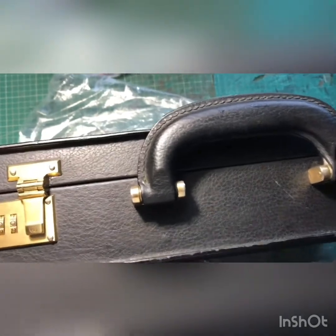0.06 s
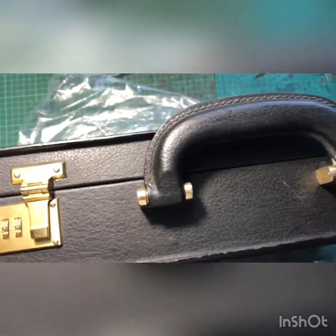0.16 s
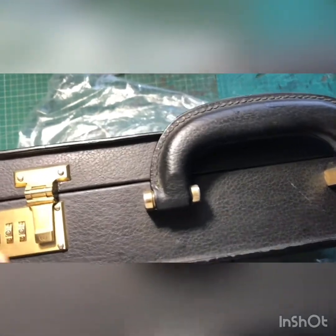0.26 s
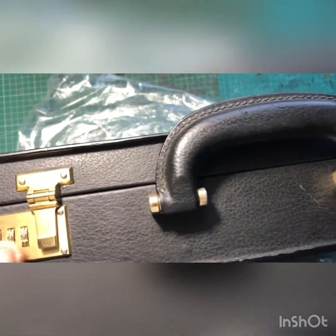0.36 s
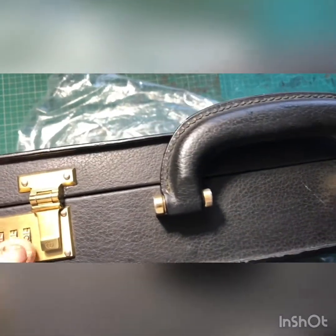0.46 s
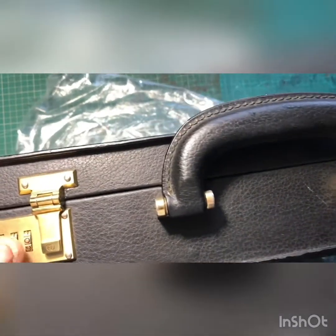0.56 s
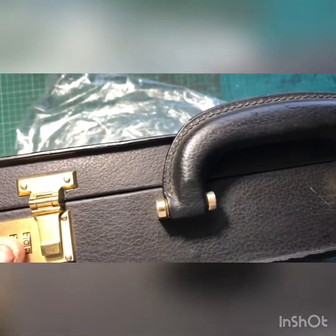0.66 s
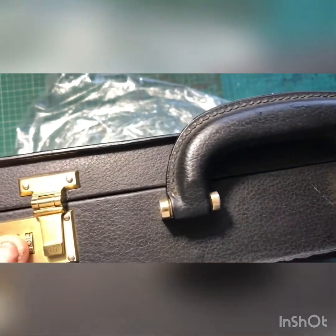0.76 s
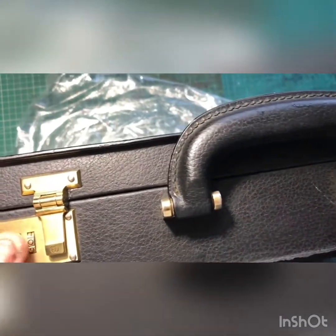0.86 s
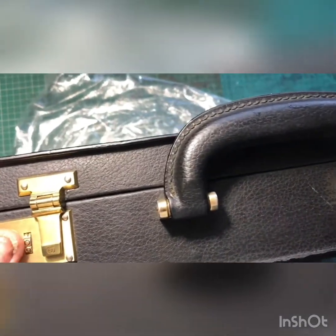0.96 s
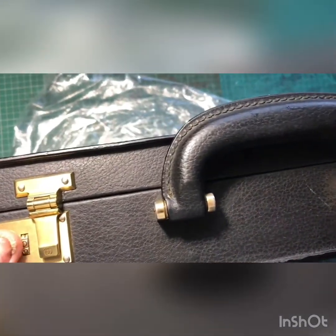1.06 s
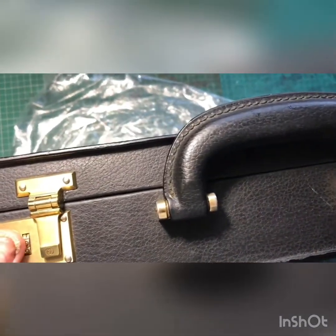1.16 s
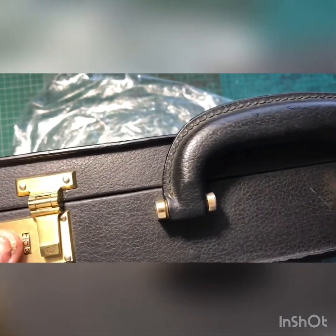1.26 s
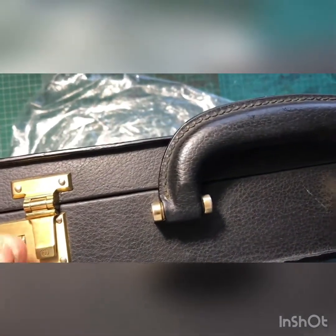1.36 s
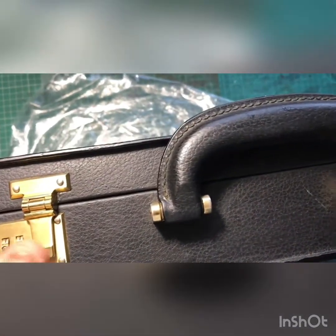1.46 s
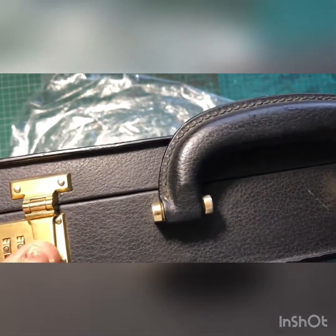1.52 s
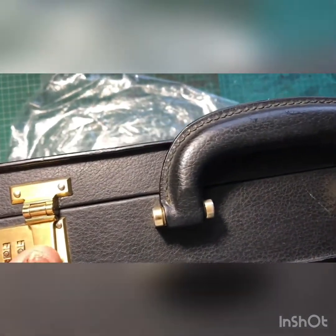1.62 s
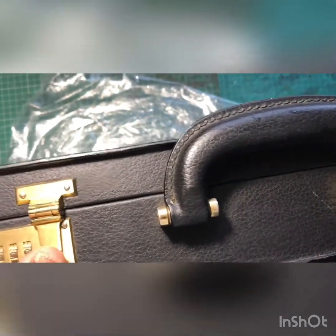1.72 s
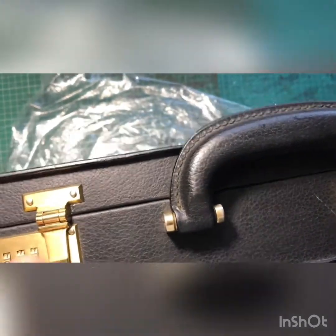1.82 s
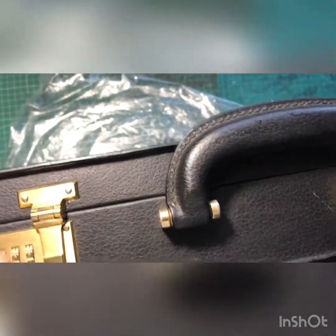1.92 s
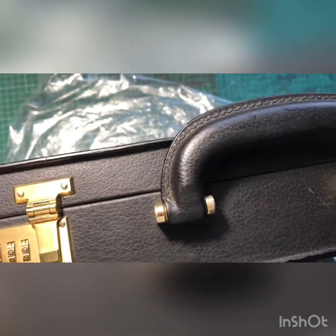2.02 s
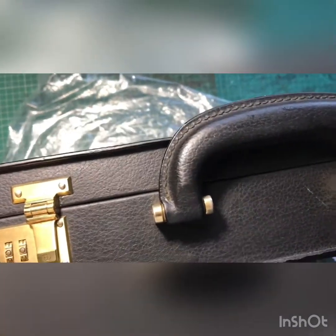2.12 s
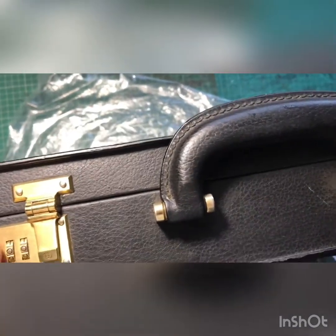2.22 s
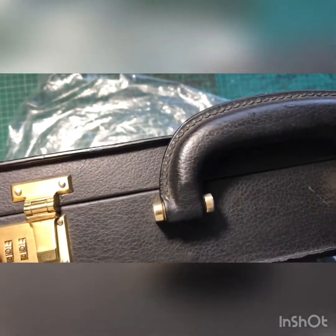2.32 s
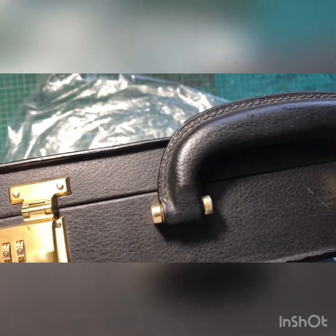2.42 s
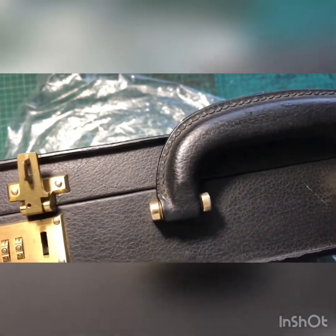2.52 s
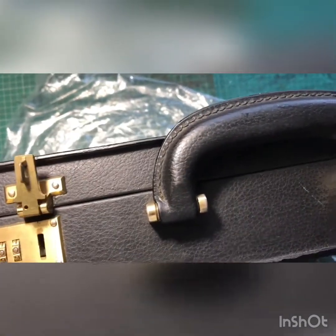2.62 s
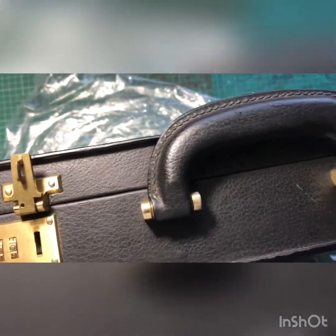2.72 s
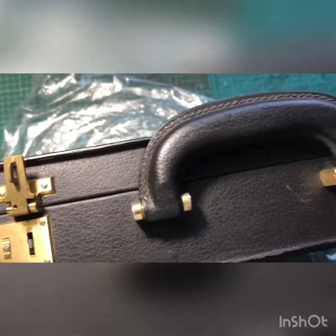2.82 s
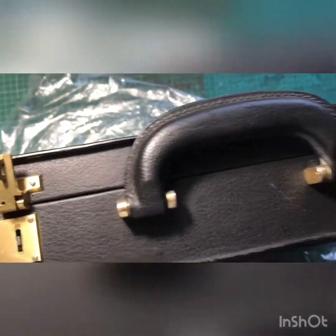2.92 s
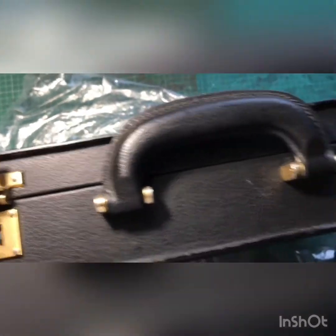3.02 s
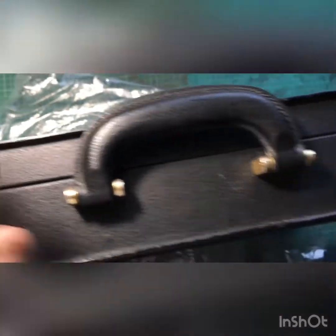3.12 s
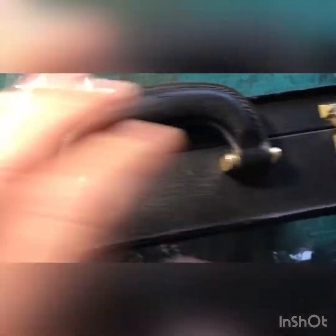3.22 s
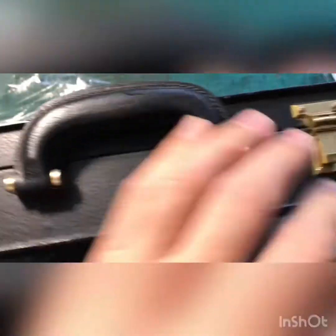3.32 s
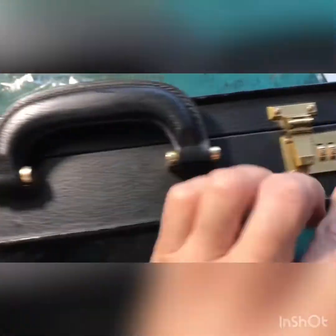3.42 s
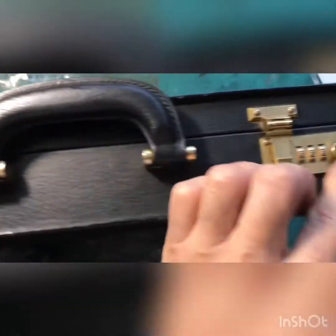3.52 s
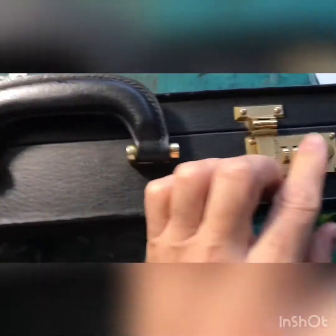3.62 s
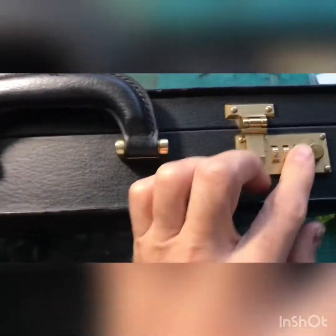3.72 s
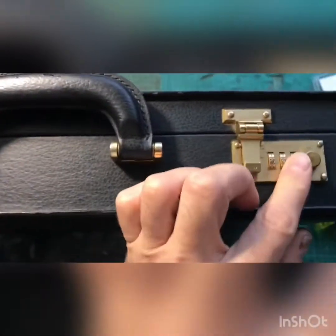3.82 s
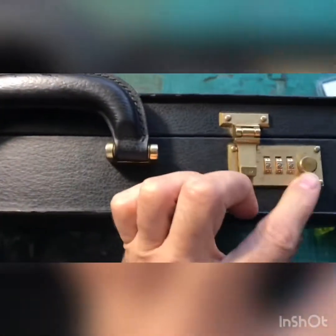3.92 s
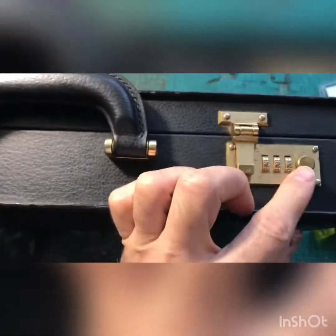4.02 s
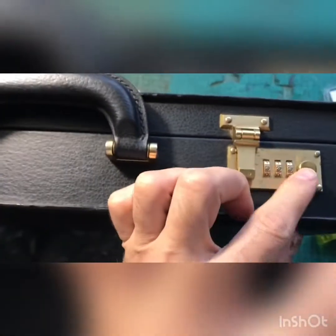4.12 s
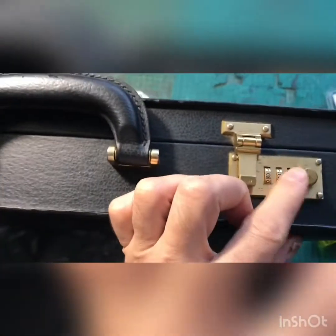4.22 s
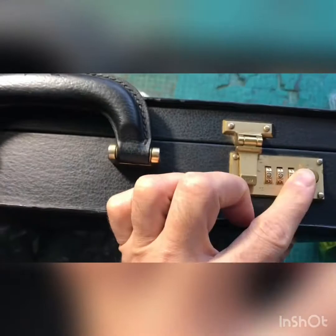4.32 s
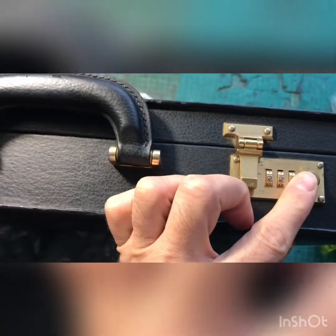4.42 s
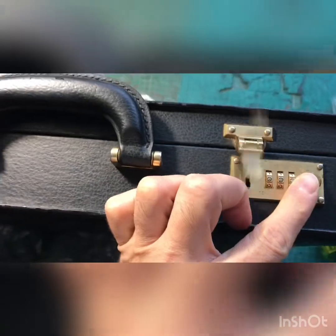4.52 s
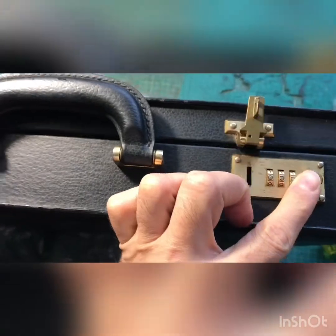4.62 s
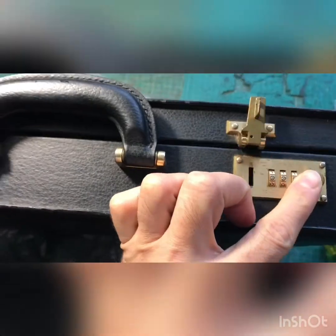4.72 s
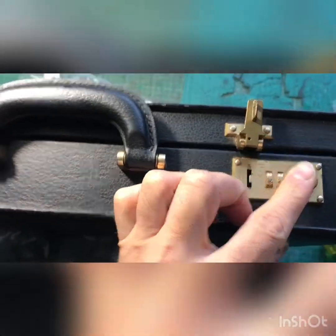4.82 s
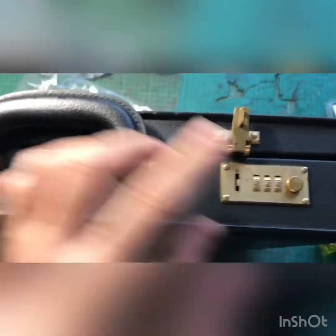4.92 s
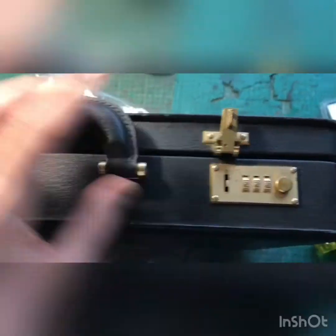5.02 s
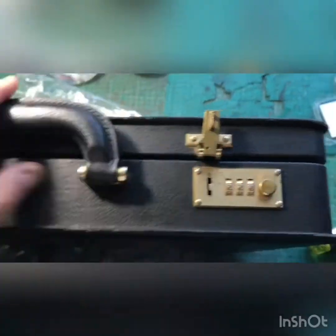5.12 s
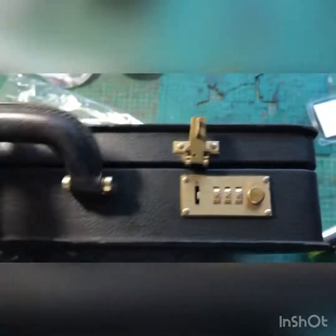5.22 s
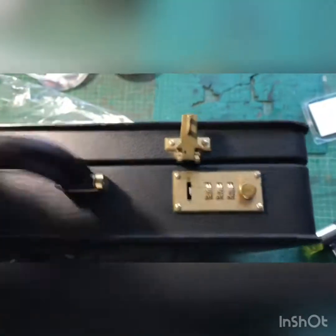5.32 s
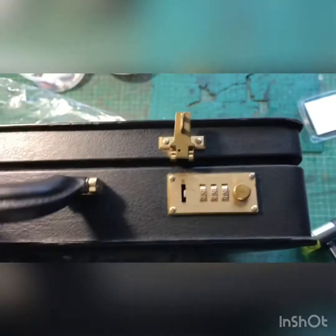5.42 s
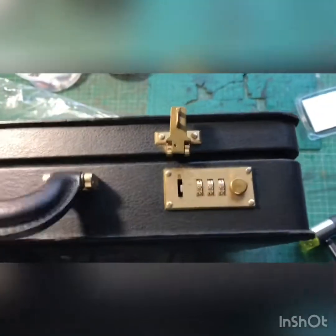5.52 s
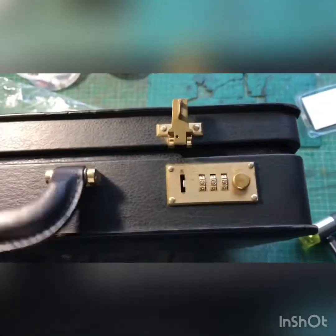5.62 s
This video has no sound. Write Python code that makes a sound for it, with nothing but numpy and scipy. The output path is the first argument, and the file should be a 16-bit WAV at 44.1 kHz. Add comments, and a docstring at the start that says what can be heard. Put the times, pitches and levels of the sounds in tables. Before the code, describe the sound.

Very close in a small room, fingers brush leather and tick brass fittings. A button clicks, then a sprung hasp slams and rebounds loudly against the hollow case. The button snaps back; after a quieter gap the second latch cracks open, followed by light handling knocks over soft air rush and low rumble.

```python
"""Two brass push-button latches of a leather briefcase snap open, close by, in a small room.
A thumb works each button, whose slide strikes its stops; each sprung hasp flies up, slams and rebounds.
Blows are coloured noise bursts plus damped modes of brass and hollow case; dry slides squeak as gliding tones.
Small ticks and skin brushing on leather surround them, over reflections, a steady rush and low rumble."""
import sys
import numpy as np
from scipy import signal
from scipy.fft import rfft
from scipy.io import wavfile
from scipy.ndimage import uniform_filter1d

SR = 44100
rng = np.random.default_rng(int(sys.argv[2]) if len(sys.argv) > 2 else 0)


def digitize_waveform(pressure):
    """Quantize a signal to 16-bit integers and store it at the path in sys.argv[1].

    Rows of a 2-D input are taken as channels; values are limited to [-1, 1].
    """
    field = np.atleast_2d(pressure).T
    bounded = np.clip(field, -1, 1)
    quanta = np.round(bounded * 32767).astype(np.int16)
    wavfile.write(sys.argv[1], SR, quanta)


N = 249606
TIME = np.arange(N) / SR  # seconds
RING = np.arange(SR // 2) / SR  # time axis of one decaying sound, seconds

# Hasps letting go and striking their stops. Each row: start in seconds, then relative levels in dB of the
# clash of brass, knock of the plate, panel ring and hollow boom, and the latch (0 left, 1 right).
HASP_BLOWS = [(2.3917, -6, -5.5, -20, -3.5, 0), (2.4172, 4.5, -3.5, 2.5, 6.5, 0),
              (2.421, 0.5, -4, -5, -23.5, 0), (2.4462, 4, 1.5, -2, -18, 0),
              (2.4507, -4.5, 0.5, -14, -11, 0), (4.4966, 5, 1, 7.5, 1, 1),
              (4.4997, -2.5, -22, -8.5, -24, 1), (4.5024, -6, 1, -4.5, -3, 1), (4.523, 0, 3.5, -6.5, -5, 1),
              (4.5368, -1, 0, -5, -11, 1)]
# Spectrum of the hasp's clash. Each row: frequency in Hz, relative level in dB for left and right latch.
CLASH_SPECTRA = [(99.9, -9.5, -30.5), (510, 15.5, 2.5), (1201, 3, -7), (1920, 17.5, 16.5), (2554, 10, 12.5),
                 (3800, 13.5, 7), (5940, 9.5, 6.5), (6800, 4.5, 4.5), (10680, 1.5, -3.5), (13240, -1, 5),
                 (15570, 2, 1.5)]
# Spectrum of the panels' short clatter. Each row: frequency in Hz, relative level in dB for left and right latch.
CLATTER_SPECTRA = [(85.3, 11.5, 8.5), (187.2, 15, 29.5), (341.2, 23.5, 24), (560, 18.5, 14.5),
                   (1000, 19.5, 19), (1750, 18.5, 16), (2896, 10.5, 4), (5920, 5, 4), (8000, -4.5, -9.5),
                   (12490, -3.5, 2), (15500, -6.5, -10)]
# Modes of the case. Each entry: frequency in Hz.
CASE_MODE_HZ = [135, 201, 228, 313, 495, 548, 678, 756, 791, 910, 955, 1065, 1096, 1170, 1217, 1298, 1367,
                1573, 1674, 1815, 1990, 2290]
# How strongly a latch rings the case. Each row: one latch, left then right; each column: a mode's relative dB.
CASE_MODE_DB = [
    [-25, -13.5, -19.5, -24.5, -36, -28.5, -32, -41, -31.5, -34.5, -22.5, -22.5, -35.5, -39.5, -40.5, -33,
     -23.5, -23, -23.5, -36, -30, -43],
    [-31, -19.5, -21, -21.5, -33, -33, -41, -22.5, -32, -20.5, -17, -26.5, -44, -23.5, -33, -45, -33, -29.5,
     -28.5, -44, -38.5, -34],
]


def hasps(clatter_t60=.11, modes_db=-3, clatter_db=-2, knock_hz=1300):
    """Impact excitation: a broadband clash, a plate knock and a clatter set off the modes of the hollow case.

    Returns the blows (clash and clatter) and the ringing (case modes and knock) separately.
    """
    clash_t60, knock_t60, hollow_t60, panel_t60 = .017, .012, .19, .165  # seconds
    blows, ringing = np.zeros((2, N))
    hollow = np.array(CASE_MODE_HZ) < 400  # the low modes boom, the others belong to the panels
    mode_t60 = np.where(hollow, hollow_t60, panel_t60)
    for s, clash_level, knock_level, panel_level, hollow_level, latch in HASP_BLOWS:
        side = int(latch > .5)
        clash = amp(clash_level) * colour(burst(clash_t60, 1), column(CLASH_SPECTRA, side))
        clatter = colour(burst(clatter_t60, 0), column(CLATTER_SPECTRA, side))
        clatter *= amp(panel_level + clatter_db)
        knock = ring([knock_hz], [knock_t60], [knock_level - 8])
        mode_level = np.array(CASE_MODE_DB[side]) + np.where(hollow, hollow_level, panel_level)
        case = ring(CASE_MODE_HZ, mode_t60, mode_level + modes_db)
        add(blows, s, clash + clatter)
        add(ringing, s, case - knock)
    return blows, ringing


# The sliding button reaching an end of its travel.
# Each row: start in seconds, relative level in dB, stroke (0 pushed home, 1 sprung back).
BUTTON_STOPS = [(1.764, -3, 0), (2.713, 2.5, 1)]
# Modes of the lock works.
# Each row: frequency in Hz, 60 dB decay time in seconds, relative level in dB pushed home and sprung back.
LOCK_MODES = [(233, 0.09, -39.5, -30.5), (1050, 0.016, -14, -25), (1472, 0.019, -8.5, -19),
              (1578, 0.0042, -10, -29), (2170, 0.011, -8, -27.5), (2680, 0.00894, -8.5, -22.5),
              (3376, 0.022, -23.5, -18), (3906, 0.0092, -16, -19.5), (4470, .016, -21, -17),
              (5520, 0.012, -26, -32.5), (6530, .014, -44, -26.5), (8065, 0.016, -42, -10),
              (9140, 0.0081, -21.5, -15.5), (9800, 0.014, -22, -31), (11100, 0.0071, -20.5, -26),
              (8180, 0.17, -75, -43.5), (8220, .25, -82, -49), (12800, .012, -44, -21.5),
              (14200, 0.01, -23, -10.5)]
# Rattle after a stroke. Each row: frequency in Hz, relative level in dB pushed home and sprung back.
RATTLE_SPECTRA = [(200, 5.5, -7.5), (693, 0.5, -13), (1400, -8, -7), (2400, -1, -4), (4200, -4.5, -9),
                  (7100, -14, -12.5), (10030, -17, -13.5), (15000, -25, -19.5)]


def buttons(crack_t60=0.033, pushed_db=-8, sprung_db=3, rattle_t60=0.22):
    """Modal response: the slide's stop rings the lock works, with a crack and a diffuse rattle in the case."""
    out = np.zeros(N)
    crack_spectrum = [(200, -7.0), (700, -9), (1300, 9.5), (5000, -4.0), (10000, 0.5), (15000, 1.0)]  # Hz, dB
    hz, t60, *level_by_stroke = np.transpose(LOCK_MODES)
    for s, db, stroke in BUTTON_STOPS:
        sprung = int(stroke > .5)
        crack = amp([pushed_db, sprung_db][sprung]) * colour(burst(crack_t60, 0.94), crack_spectrum)
        rattle = colour(burst(rattle_t60, 0), column(RATTLE_SPECTRA, sprung))
        works = ring(hz, t60, level_by_stroke[sprung])
        add(out, s, amp(db) * (works + crack + rattle))
    return out


# Dry brass squeaking as it slides.
# Each row: start in seconds, length in seconds, start frequency in Hz, end frequency in Hz, level in dB.
SLIDE_SQUEAKS = [(2.7004, 0.017, 5260, 5100, -29.5), (4.4724, 0.0037, 7830, 8220, -16.5),
                 (4.4744, 0.01, 8070, 8170, -15), (4.483, 0.01, 7980, 8130, -42.5)]


def squeaks(waver_hz=110, overtone_db=-22):
    """Stick-slip friction: one mode of the slide sounds for milliseconds as a gliding, wavering tone."""
    out = np.zeros(N)
    for s, length, start_hz, end_hz, db in SLIDE_SQUEAKS:
        n = int(length * SR)
        waver = unit(uniform_filter1d(rng.standard_normal(len(RING)), size=30))[:n]
        pitch = np.linspace(start_hz, end_hz, n) + waver_hz * waver
        phase = 2 * np.pi * np.cumsum(pitch) / SR
        tone = np.sin(phase) + amp(overtone_db) * np.sin(2 * phase)
        add(out, s, amp(db) * signal.windows.tukey(n, .8) * tone)
    return out


# Small knocks of fingers, button and loose fittings. Each row: start in seconds, relative click level in dB,
# brightness in dB per octave, relative case thud level in dB, pitch of the part touched in Hz.
SMALL_KNOCKS = [(0.5365, -24, -2.5, -26, 2320), (0.8027, -23.5, -2, -1.5, 2710),
                (0.8605, -19, -2.5, 0, 4260), (1.479, -15, -1.5, -19, 2920), (1.497, -13, -6, 14.5, 2970),
                (1.6015, -24.5, 8, -5, 2380), (1.6328, -23, 5.5, 0.5, 3680), (1.6931, -17.5, 3, -18, 4570),
                (1.719, -19, 1, -8, 5040), (1.7546, -17.5, -.5, 4, 6000), (1.9443, -15.5, -3.5, 4, 1250),
                (2.3852, -9.5, -6.5, -12.5, 1400), (2.4113, -16, 6, -7, 1620), (2.6793, -11.5, 1, 10, 1490),
                (2.954, -22, 0, -20, 5310), (3.5147, -27, 1, 7, 2595), (3.6456, -14.5, 1, -18, 3030),
                (4.0266, -16, -6, 9, 1350), (4.1158, -10.5, 3, -18, 2710), (4.1268, -14.5, 3, -11.5, 2680),
                (4.2257, -18, -5, 6.5, 1410), (4.4705, 3.5, 3, 22, 1536), (4.4878, -3, 0.5, 15.5, 2640),
                (4.7608, -8.5, 2.5, 8.5, 1733), (5.0683, -28, 6, 15.5, 915), (5.1147, -21, -4, -15, 1900),
                (5.1798, -30, 9, -20, 3170), (5.2274, -8.5, 1, 18.5, 1660), (5.2977, -25.5, -8, 12.5, 930),
                (5.382, -19, -2, 10.5, 3250), (5.4988, -25.5, -3, 9.5, 2410), (5.6064, -9, -2.5, 5.5, 3700)]
# Spans in which a hand on the case makes its fittings tick faintly. Each row: start in seconds, end in seconds.
HANDLING_SPANS = [(1.6, 1.95), (3.748, 3.92), (5.3, 5.55)]
FAINT_PER_S, FAINT_DB, FAINT_SPREAD_DB, FAINT_THUD_DB = 6, -27, 0.5, -11  # rate, relative levels and scatter
FAINT_TILT_DB = -4  # scatter of brightness, dB per octave
FAINT_PITCH_HZ, FAINT_PITCH_OCTAVES = 3800, .6  # central pitch and scatter to either side


def ticks():
    """Light impacts: clear knocks at set times, and faint ones scattered at random through the handling."""
    out = np.zeros(N)
    for s, *blow in SMALL_KNOCKS:
        add(out, s, contact(*blow))
    for start, end in HANDLING_SPANS:
        count = round((end - start) * FAINT_PER_S)
        for k, (place, size, tilt, pitch) in enumerate(rng.uniform(-1, 1, (count, 4))):
            s = start + (end - start) * (k + .5 + place / 2) / count  # one at random within each equal share
            ping_hz = FAINT_PITCH_HZ * 2 ** (FAINT_PITCH_OCTAVES * pitch)
            db = FAINT_DB + FAINT_SPREAD_DB * size
            add(out, s, contact(db, FAINT_TILT_DB * tilt, FAINT_THUD_DB, ping_hz))
    return out


# Basic spectrum of a click. Each row: frequency in Hz, relative level in dB.
CLICK_SPECTRUM = [(200, -6), (1100, 5.5), (2600, 2), (4500, -1), (11000, -10.5), (15000, -10)]
# Spectrum of the panels under a light contact. Each row: frequency in Hz, relative level in dB.
THUD_SPECTRUM = [(60, -21), (150, 5), (300, 4), (600, -16.5), (1200, -20), (3000, -35), (9000, -47.5)]
TICK_PIVOT_HZ = 3500  # the brightness tilt turns about this frequency
TICK_T60, TICK_SHORTER_PER_DB = .022, 0.19  # seconds at zero tilt; the brighter the contact, the sooner it dies
TICK_BUMP_DB, TICK_BUMP_OCTAVES = 6, 0.21  # emphasis around the pitch of the part touched


def contact(db, tilt_db, case_db, ping_hz, thud_db=-46, thud_hz=200, thud_t60=0.085,
            click_db=-2, ping_db=-24, ping_t60=.009, panel_db=-12, panel_t60=0.074):
    """Superposition of one contact's parts: a short click, the touched part's ping, a thud and the panels."""
    hz = np.geomspace(200, 16000, 40)
    octaves = np.log2(np.clip(hz, 1100, 11000) / TICK_PIVOT_HZ)
    bump = TICK_BUMP_DB * np.exp(-(np.log2(hz / ping_hz) / TICK_BUMP_OCTAVES) ** 2)
    spectrum = np.c_[hz, db + read(CLICK_SPECTRUM, hz) + tilt_db * octaves + bump]
    click_t60 = TICK_T60 * np.exp(-TICK_SHORTER_PER_DB * tilt_db)
    click = amp(click_db) * colour(burst(click_t60, 0.93), spectrum)
    ping = ring([ping_hz], [ping_t60], [db + ping_db])
    thud = ring([thud_hz], [thud_t60], [case_db + thud_db])
    panels = amp(case_db + panel_db) * colour(burst(panel_t60, 0), THUD_SPECTRUM)
    return click + ping + thud + panels


# Hiss of skin. Each row: frequency in Hz, relative level in dB.
SKIN_SPECTRUM = [(200, -32.5), (1000, 4.5), (2200, 1.5), (4400, -0.5), (6500, -3.5), (8500, -3.5),
                 (10400, -4.5), (13000, -1), (16000, -10)]
# Hiss of the slide in its slot. Each row: frequency in Hz, relative level in dB.
SCRAPE_SPECTRUM = [(200, -22), (1000, 6.5), (2200, 8), (4400, 1.5), (6500, -4.5), (10400, -10.5),
                   (15000, -10.5)]
# Strokes of skin over leather and brass. Each row: start in seconds, length in seconds, peak level in dB.
SKIN_STROKES = [(.03, .16, -72.5), (.49, .13, -62.5), (1.34, 0.07, -69.5), (1.47, 0.14, -64),
                (1.59, 0.19, -55.5), (3.64, .3, -66.5), (5.04, .13, -62), (5.19, .07, -56),
                (5.28, 0.1, -57.5), (5.35, 0.22, -63), (5.58, 0.1, -62)]
# The spring-loaded slide scraping along its slot. Each row: start in seconds, length in seconds, level in dB.
SLIDE_SCRAPES = [(2.362, .017, -47.5), (2.68, 0.025, -45.5), (2.7, 0.016, -40), (4.469, .012, -32),
                 (4.728, 0.05, -50.5)]
STROKE_EDGE_SHARE, SCRAPE_EDGE_SHARE = 0.65, 0.42  # share of each spent swelling and fading
RESTING_SKIN_DB = -84  # the hand at rest


def rubbing(grains_per_s=200, grain_db=6.5, smooth=0.28):
    """Dry friction: random tiny slips modulate noise, band by band, over the soft hiss of skin and slide."""
    hiss = np.zeros(N)
    edges = [300, 2500, 5000, 8000, 12000, 17000]  # Hz
    for band in zip(edges, edges[1:]):
        slip_size = amp(grain_db * np.minimum(rng.exponential(1, N), 3))
        slips = (rng.random(N) < grains_per_s / SR) * slip_size
        grip = unit(signal.fftconvolve(slips, dying(.012))[:N])
        band_filter = signal.butter(2, band, "band", fs=SR, output="sos")
        hiss += signal.sosfilt(band_filter, (smooth + 0.22 * grip) * rng.standard_normal(N))
    skin_gain = amp(RESTING_SKIN_DB) + swells(SKIN_STROKES, STROKE_EDGE_SHARE)
    skin = skin_gain * unit(colour(hiss, SKIN_SPECTRUM))
    scrape = swells(SLIDE_SCRAPES, SCRAPE_EDGE_SHARE) * unit(colour(hiss, SCRAPE_SPECTRUM))
    return skin + scrape


# Reverberation of the room. Each row: frequency in Hz, 60 dB decay time in seconds.
REVERB_T60 = [(150, 0.39), (400, 0.36), (1000, 0.33), (2800, .32), (6000, 0.28), (9000, 0.13),
              (15000, 0.18)]


def room(x, first_s=.005):
    """Reverberation: dense reflections off bench and walls, each band dying at its own speed."""
    taps = rng.standard_normal(len(RING)) * (rng.random(len(RING)) < 5000 / SR) * (RING > first_s)
    hz, t, bands = signal.stft(taps, SR, nperseg=256)
    decay = np.exp(-np.log(1000) * t / read(REVERB_T60, hz)[:, None])
    tail = signal.istft(bands * decay, SR, nperseg=256)[1]
    wet = signal.fftconvolve(x, tail / np.linalg.norm(tail))[:N]
    # spectrum of the reflections: Hz, dB
    return colour(wet, [(200, -11.0), (1000, -10.5), (2500, -14.5), (5000, -17), (9000, -13.5), (15000, -15.5)])


# The room's steady rush. Each row: frequency in Hz, relative level in dB at the left and the right latch.
AIR_SPECTRA = [(19.88, -15, -18), (150, 1, -7), (302.6, 5.5, 4.5), (556, -1, 6), (1020, 2, 2.5),
               (1615, 0, -4), (2560, -8.5, -6), (4550, -19.5, -17), (6444, -21, -24.5), (10370, -31, -32),
               (14000, -22.5, -26.5), (16000, -23, -24.5)]
# Low rumble of the room and of hands on the case. Each row: frequency in Hz, relative level in dB.
RUMBLE_SPECTRUM = [(30, -24.5), (70, -24), (95, -18), (130, 3), (165, -1), (205, 2), (260, -7),
                   (350, -13.5), (700, -63.5)]
# Deep rumble. Each row: frequency in Hz, relative level in dB.
DEEP_SPECTRUM = [(10, -31), (22, -19.5), (36, 4.5), (62, 6.5), (80, -1), (110, -2.5), (200, -36)]
# The hand shifts its weight and the case rumbles.
# Each row: start in seconds, length in seconds, peak level in dB.
WEIGHT_SHIFTS = [(2.97, .22, -52), (3.38, .26, -50), (3.78, 0.46, -52.5), (4.78, .38, -51),
                 (5.19, .24, -42.5), (5.47, .34, -48.5)]
SHIFT_EDGE_SHARE = 0.78  # share of a shift spent swelling and fading
AIR_LEFT_DB, AIR_RIGHT_DB = -60.5, -58  # level of the rush at each latch
RUMBLE_LEFT_DB, RUMBLE_RIGHT_DB = -56, -51.5  # level of the steady rumble at each latch


def background(move_from=1.6, move_to=4.3, deep_db=-62.0, deep_follows=0.46):
    """Stationary noise, crossfaded in power as the listening point moves along the case, over rumble."""
    moved = np.interp(TIME, [move_from, move_to], [0, 1])  # 0 at the left latch, 1 at the right
    left, right = (unit(colour(rng.standard_normal(N), column(AIR_SPECTRA, k))) for k in range(2))
    air = amp(AIR_LEFT_DB) * np.sqrt(1 - moved) * left + amp(AIR_RIGHT_DB) * np.sqrt(moved) * right
    steady = amp(RUMBLE_LEFT_DB + (RUMBLE_RIGHT_DB - RUMBLE_LEFT_DB) * moved)
    handling = np.hypot(steady, swells(WEIGHT_SHIFTS, SHIFT_EDGE_SHARE))
    # the deep part swells less than the case's rumble
    deep_noise = handling ** deep_follows * colour(rng.standard_normal(N), DEEP_SPECTRUM)
    deep = amp(deep_db) * unit(deep_noise)
    return air + deep + handling * unit(colour(rng.standard_normal(N), RUMBLE_SPECTRUM))


def amp(db):
    """Logarithmic level: decibels to gain."""
    return 10 ** (np.asarray(db) / 20)


def unit(x):
    """Root mean square: scales a signal to rms 1."""
    return x / np.sqrt(np.mean(x ** 2) + 1e-20)


def read(points, hz):
    """Interpolation on a log-frequency axis."""
    f, value = np.transpose(points)
    return np.interp(np.log(hz + 1), np.log(f + 1), value)


def column(table, index):
    """One spectrum (Hz, dB) out of a table that holds several."""
    return np.array(table)[:, [0, index + 1]]


def add(mix, s, sound):
    """Superposition: mixes a sound in at time s (seconds)."""
    part = mix[round(s * SR):][:len(sound)]
    part += sound[:len(part)]


def swells(rows, edge_share):
    """Amplitude envelope: each row (start s, length s, dB) rises smoothly, holds and falls."""
    gain = np.zeros(N)
    for s, length, db in rows:
        add(gain, s, amp(db) * signal.windows.tukey(int(length * SR), np.clip(edge_share, 0, 1)))
    return gain


def colour(x, points):
    """Minimum-phase filtering: a causal filter with the given spectrum, so that attacks stay sharp."""
    size = 4096
    log_gain = np.log(amp(read(points, abs(np.fft.fftfreq(size, 1 / SR)))))
    taps = np.fft.ifft(np.exp(np.conj(signal.hilbert(log_gain)))).real[:size // 2]
    return signal.fftconvolve(x, taps)[:len(x)]


def dying(t60):
    """Exponential decay: an envelope that falls 60 dB in t60 seconds (at least 1 ms)."""
    return np.exp(-np.log(1000) * RING / np.maximum(t60, 1e-3))


def burst(t60, spike):
    """High modal density: a spike, then noise for countless modes dying together, evened across frequency."""
    x = rng.standard_normal(len(RING)) * dying(t60)
    x /= np.linalg.norm(x)
    x[0] -= spike
    power = uniform_filter1d(abs(rfft(x)) ** 2, size=300)
    return colour(x, np.c_[np.fft.rfftfreq(len(x), 1 / SR), -10 * np.log10(power)])


def ring(hz, t60, db):
    """Modal superposition: damped sines, neighbouring modes swinging against each other."""
    modes = enumerate(zip(hz, t60, db))
    return sum((-1) ** k * amp(d) * dying(t) * np.sin(2 * np.pi * f * RING) for k, (f, t, d) in modes)


def scene():
    """Direct and reverberant sound: all of the case's sounds, close, with the room around them."""
    blows, ringing = hasps()
    outer = blows + squeaks() + ticks() + rubbing()
    inner = ringing + buttons()
    case = outer + inner + room(outer + inner / 2.5)  # the inner sounds excite the room less
    # the case's sounds carry little below 50 Hz
    case = signal.sosfilt(signal.butter(2, 50, "high", fs=SR, output="sos"), case)
    return (case + background())[None]


def record(dry, ceiling=1.0):
    """Soft saturation rounds off the loudest peaks; a linear-phase low-pass then limits the band."""
    rounded = dry / (1 + (dry / ceiling) ** 4) ** (1 / 4)
    low_pass = signal.firwin(255, 16200, window=("kaiser", 9), fs=SR)  # cutoff in Hz
    return signal.oaconvolve(rounded, low_pass[None], "same")


dry = scene()
out = record(dry)
digitize_waveform(out)
```